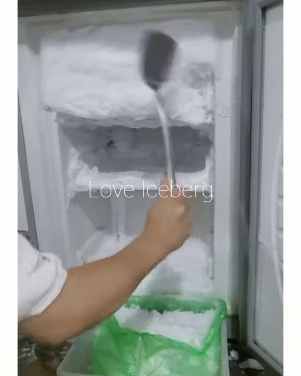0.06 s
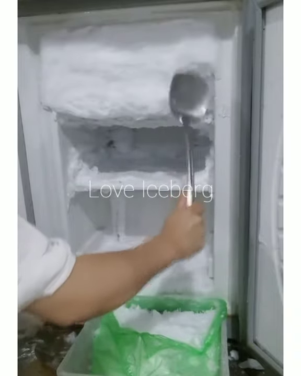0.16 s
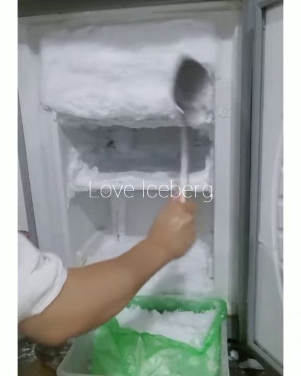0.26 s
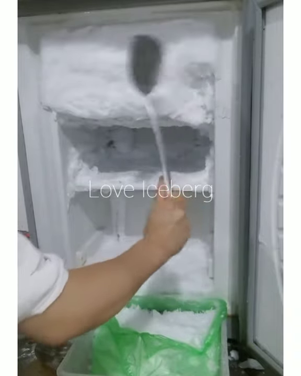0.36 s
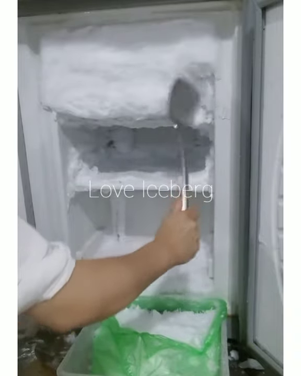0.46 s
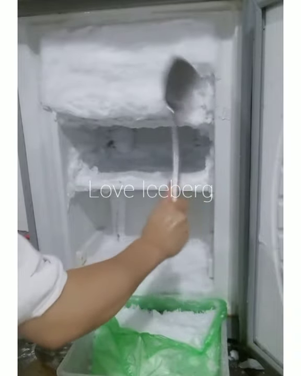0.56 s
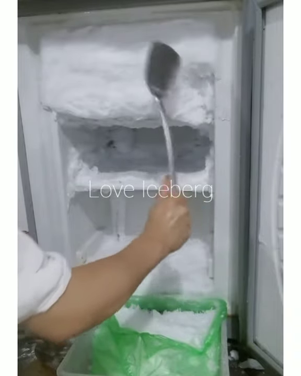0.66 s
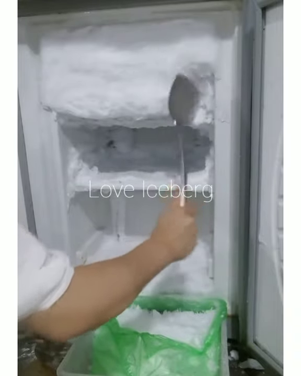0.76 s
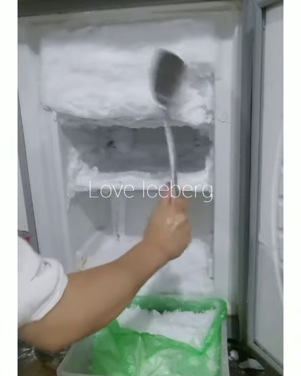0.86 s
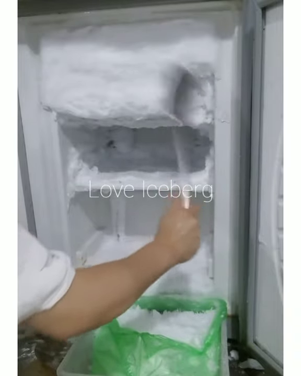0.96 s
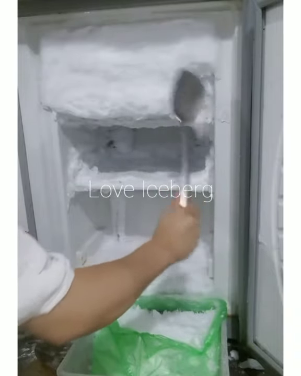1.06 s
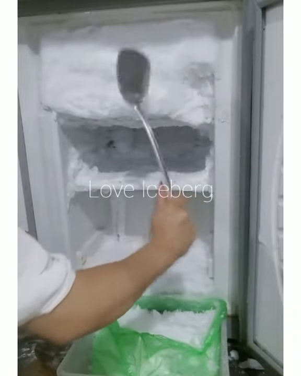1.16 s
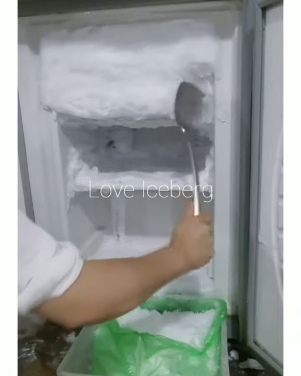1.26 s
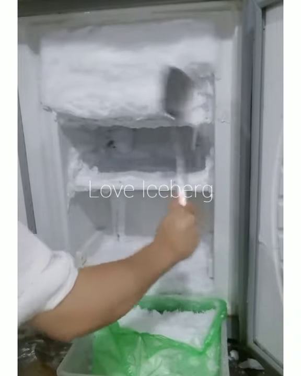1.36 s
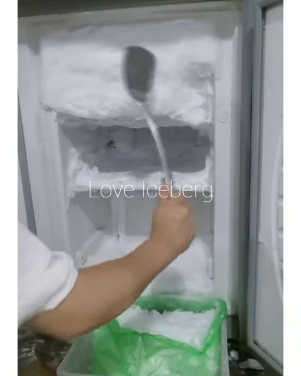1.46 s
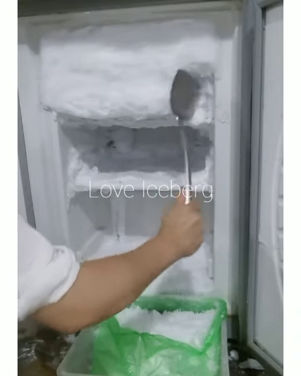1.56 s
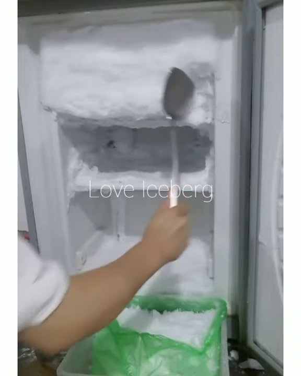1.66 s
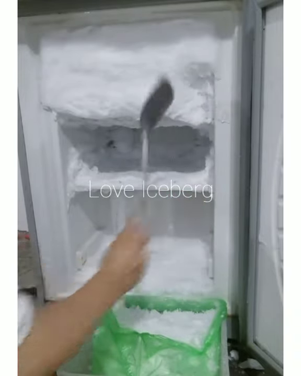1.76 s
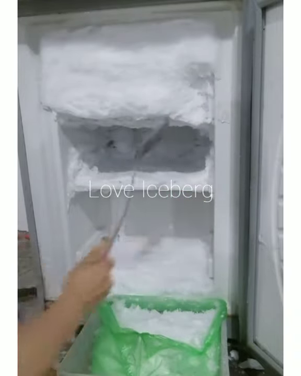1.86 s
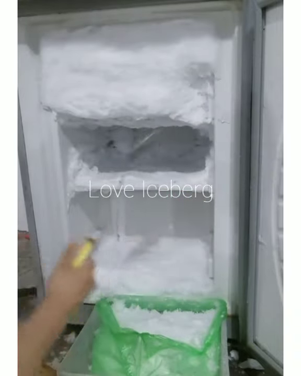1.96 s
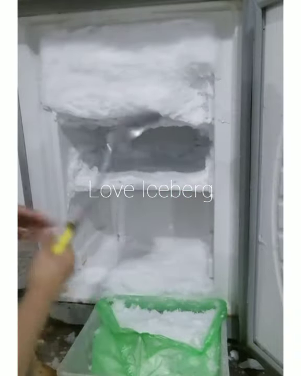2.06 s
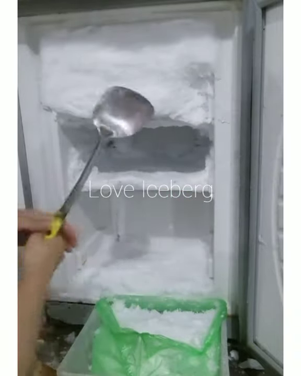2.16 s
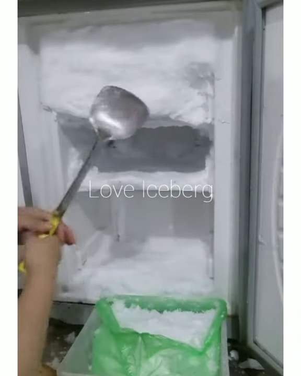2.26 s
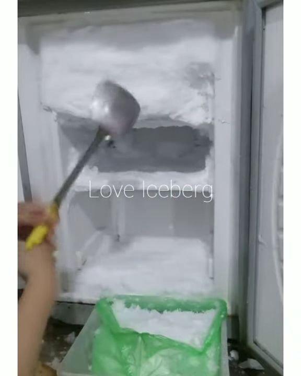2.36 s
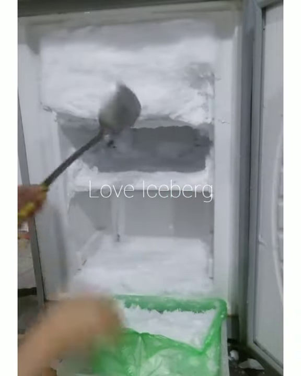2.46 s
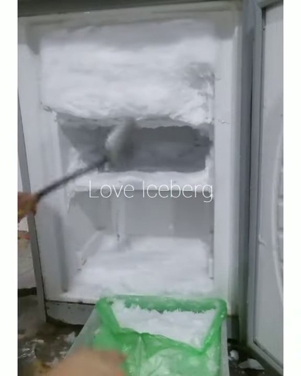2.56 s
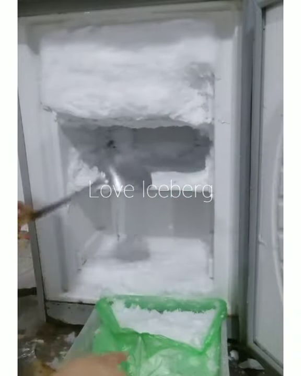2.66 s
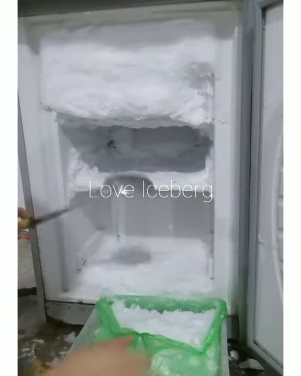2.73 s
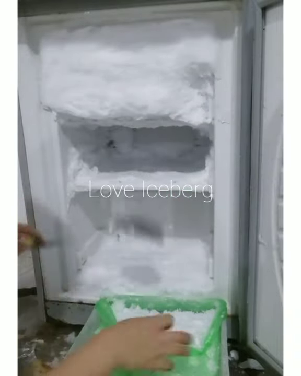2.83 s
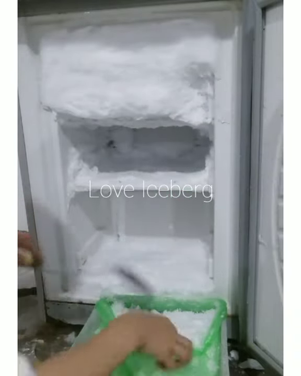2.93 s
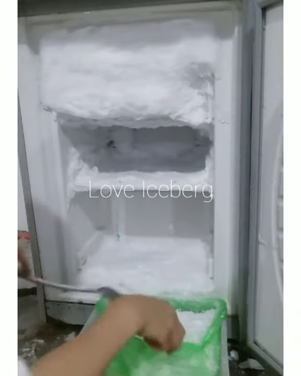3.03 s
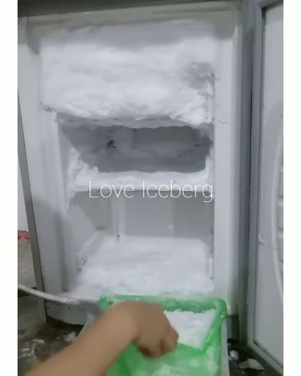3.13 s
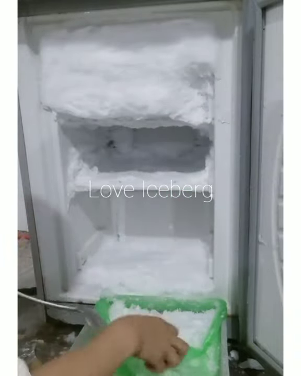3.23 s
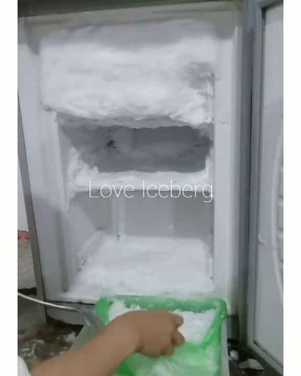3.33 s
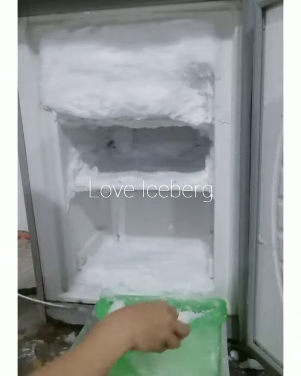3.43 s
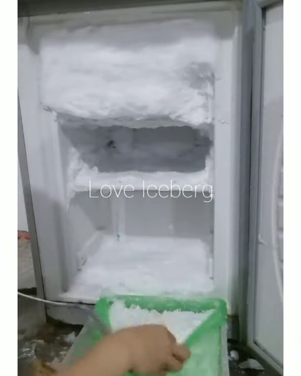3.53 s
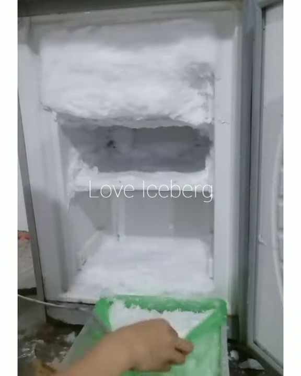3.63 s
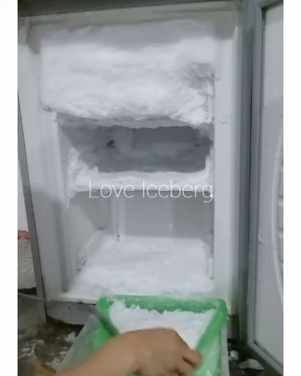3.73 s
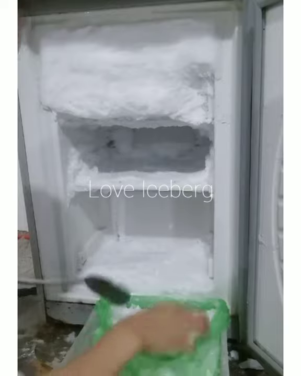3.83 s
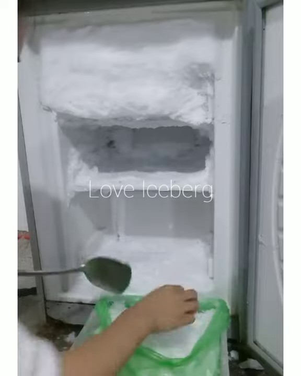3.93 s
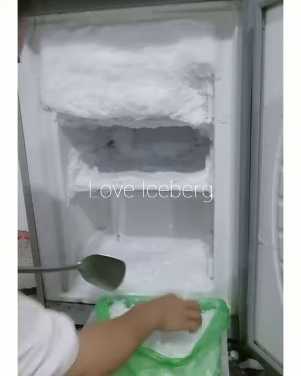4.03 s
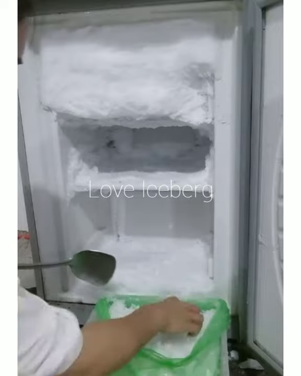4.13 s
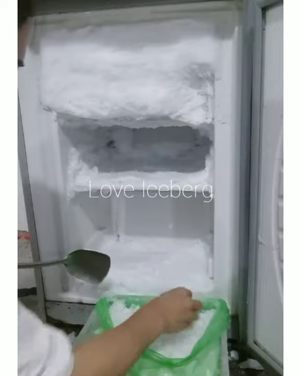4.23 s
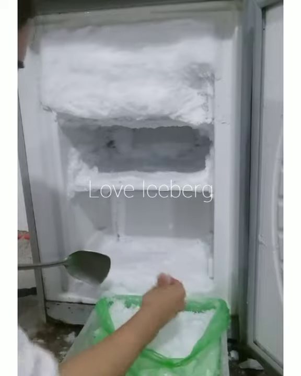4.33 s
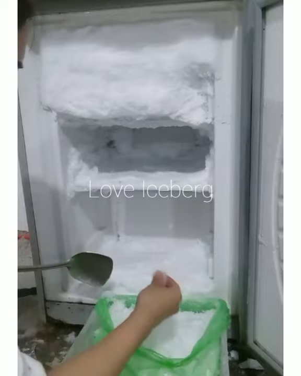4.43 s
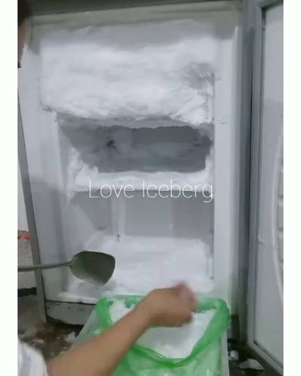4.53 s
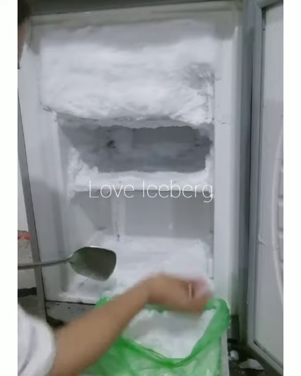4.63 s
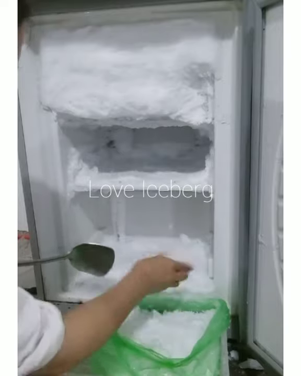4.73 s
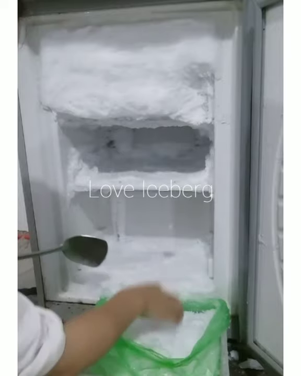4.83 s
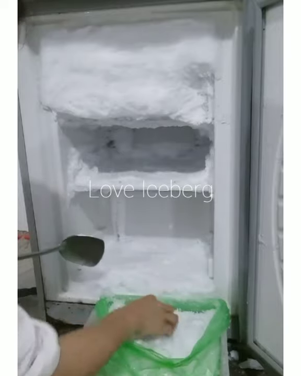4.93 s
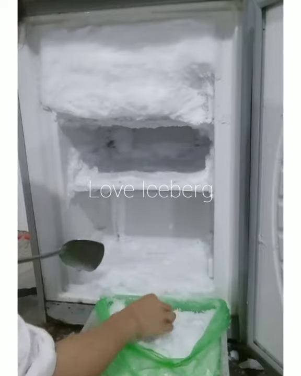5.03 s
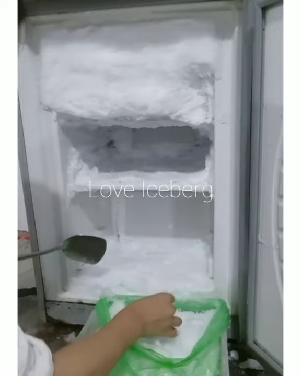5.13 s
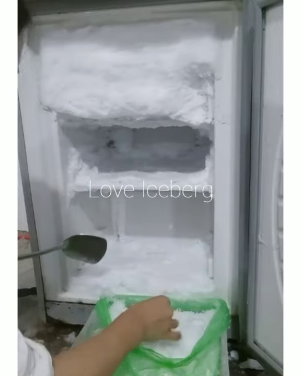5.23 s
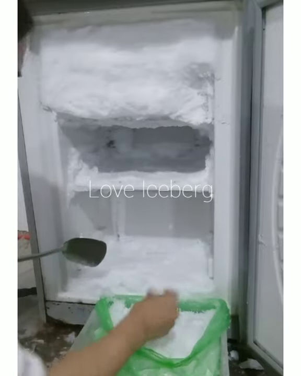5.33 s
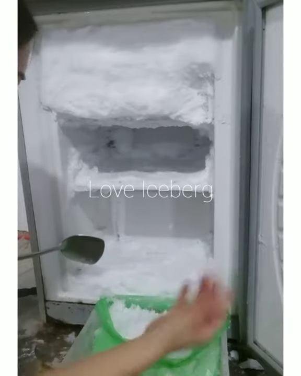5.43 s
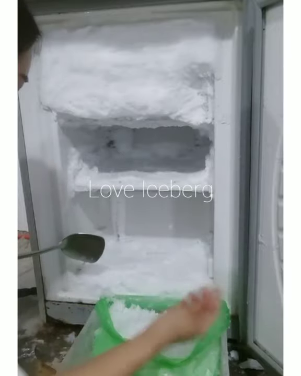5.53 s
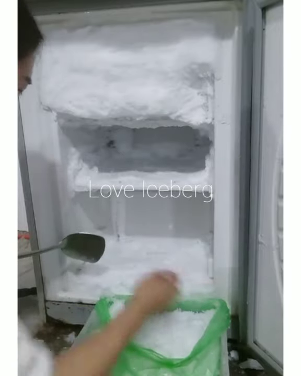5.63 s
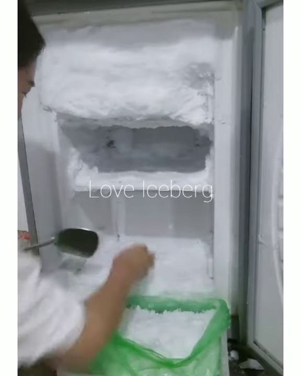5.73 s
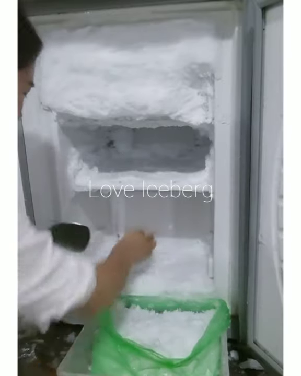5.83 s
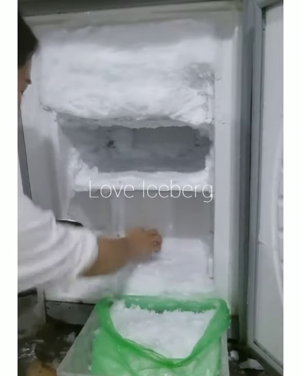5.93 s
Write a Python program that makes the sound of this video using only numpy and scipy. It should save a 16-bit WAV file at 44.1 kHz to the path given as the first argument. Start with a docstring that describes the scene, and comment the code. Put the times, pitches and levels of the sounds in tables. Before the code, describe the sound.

A thin steel spatula hacks at thick freezer frost for under two seconds, in uneven blows with gritty, hissing scrapes and a dull cabinet thump. After a pause, a hand crunches through loose frost in a bag, a few lumps drop and rumble, and a handful is scattered at the end. Close phone microphone, hard reverberant tiled room.

```python
"""A tiled room with an open freezer: a steel spatula chops thick frost, each blow cracking ice, ringing the
blade and thumping the cabinet, with crumbs grinding on after it. Then a hand digs in a bag of loose frost,
lumps land and roll, and handfuls are thrown in. Blows are noise bursts and pushes through resonances; frost is
coloured grit, with a bright band near 8 kHz. The room answers; one phone microphone limits the loudest peaks."""
import sys
import numpy as np
from scipy import signal
from scipy.fft import rfft, irfft, next_fast_len
from scipy.io import wavfile
from scipy.ndimage import uniform_filter1d

SR = 44100
rng = np.random.default_rng(int(sys.argv[2]) if len(sys.argv) > 2 else 0)


def transcribe(signal):
    """Save signal, clipped to [-1, 1], as a 16-bit WAV file at the path in sys.argv[1]."""
    frames = np.atleast_2d(signal).T
    limited = np.clip(frames, -1, 1)
    pcm = np.round(limited * 32767).astype(np.int16)
    wavfile.write(sys.argv[1], SR, pcm)


N = 264159  # samples

# All table levels are relative; the layers set their own gains.
# Idle room noise: f/Hz, level/dB
IDLE_COLOUR = [(15, -61), (25, -26), (170, -5), (200, 1), (229, -13), (439, -6.5), (503, -14.5), (591, -10),
               (754, -22.5), (818, -18.5), (962, -22.5), (1100, -22.5), (16000, -50.5)]
# Decay of the tiled room: f/Hz, t60/s
ROOM_DECAY = [(80, 2), (400, 1.5), (1100, 1.21), (2100, 1.165), (3200, 0.75), (7700, 0.42), (15000, .25)]

# Hand digging in the bag: t/s, first level/dB, push/s, rise/(dB/s), fade/(dB/s), crusts over fine frost/dB
DIGS = [(2.934, -43.5, 0.08, 162, 157, -7.5), (3.14, -48, 0.11, 90, 298, -37),
        (3.227, -37.5, 0.058, 7, 132, -2), (3.29, -52, 0.016, 5, 150, -27.5),
        (3.334, -29.5, 0.16, 31.5, 97, -3.5), (3.757, -47.5, 0.082, 11, 137.5, -7.5)]
# Handfuls scattering in the cabinet: t/s, first level/dB, fade/(dB/s)
THROWS = [(5.738, -62, 305), (5.787, -20.5, 98), (5.976, -23, 250)]
# Crystals flying off the dropped lump: t/s, first level/dB, duration/s
SPRAYS = [(4.919, -50.5, 0.13), (5.042, -58.5, 0.078)]
# Crunches in loose frost: t/s, peak level/dB, tilt/(dB/octave)
CRUNCHES = [(2.9522, -31, 2), (3.0031, -17, 3), (3.2288, -6.5, 2), (3.2962, -9.5, 4), (3.334, -4, 1),
            (3.545, -7, -14.5), (3.714, -28.5, -25), (5.7389, -37, -2.5), (5.7866, 0.5, -1.5),
            (5.8027, -4, -0.5), (5.8176, -2.5, 5), (5.9758, -14.5, 2)]
# Colours of fine frost, lump spray, thrown frost, hard crusts and the shifting bag: f/Hz, level/dB
FROST_COLOUR = [(500, -65.5), (1000, -30.5), (2300, -13), (3500, -7.5), (5000, -10.5), (7000, -5),
                (8000, 1), (8700, -6), (9300, -8), (10500, -14), (16000, -25)]
SPRAY_COLOUR = [(1760, -35), (3000, -3.5), (4410, -6.5), (5250, -17), (8050, 2.5), (10200, -21.5),
                (11400, -20), (16000, -28.5)]
THROWN_COLOUR = [(400, -21.5), (900, -15.5), (1300, -3.5), (1700, -6), (5000, -12), (7000, -10.5),
                 (8000, -2.5), (8800, -13), (10500, -21.5), (16000, -25)]
CRUST_COLOUR = [(250, -33), (700, -19.5), (1000, -13.5), (1400, -4), (2400, -2.5), (3500, -6),
                (6000, -18.5)]
BAG_COLOUR = [(40, -31), (90, 0.5), (200, -4), (450, -1.5), (800, -14), (1200, -27)]

# Frozen lumps landing: t/s, peak level/dB, contact/s, knock over thump/dB, place (0 tub, 1 cabinet)
LUMPS = [(4.901, -37.5, 0.0019, -9, 0), (4.924, -7.5, 0.00068, -12, 0), (5.036, -19, 0.000824, 9, 0),
         (5.053, -24.5, 0.0015, 2.5, 1), (5.79, -23, 0.00088, 9, 1), (5.804, -33, 0.0026, 9, 1),
         (5.821, -13.5, 0.0018, -3, 1)]
# Lumps rolling: t/s, first level/dB, rolling time/s, fade/(dB/s)
ROLLS = [(4.92, -21, 0.13, 70), (5.03, -27, 0.205, 58), (5.793, -20.5, 0.156, 505), (5.977, -39, .1, 12)]
# Rolling rumble in the tub: f/Hz, level/dB
ROLL_COLOUR = [(40, -74), (90, -15), (150, -16), (227, 5), (348, 0.5), (382, 8), (563, -1.5), (1370, -4),
               (1750, -16), (2500, -26.5), (3000, -54.5), (4400, -61), (6500, -75.5)]
# Resonances of the booming tub and of the lump itself: f/Hz, width/Hz, level/dB
TUB_MODES = [(206, 54, 7.5), (233, 49, 6.5), (404, 8.9, 11), (527, 160, 10.5)]
LUMP_MODES = [(780, 230, 4), (1156, 490, 4.5), (2373, 800, -4), (4000, 1000, -13.5)]

# Blade on ice: t/s, tip level/dB, then over the tip: root/dB, handle/dB, ice/dB, cabinet/dB; contact/s
BLOWS = [(0.2139, 1.5, -27.5, -16.5, -3.5, -23, 0.0051), (0.2199, -2, -16.5, 6.5, -2.5, -19.5, 0.0064),
         (0.472, -30.5, -13, -12, 4.5, -21.5, 0.016), (0.4918, -1, -13.5, -26, 1.5, -29.5, 0.0095),
         (0.5104, -1.5, -5.5, 2, 1, -25.5, 0.0061), (0.5531, -19, -7, 8.5, 2.5, -2, 0.0071),
         (0.5731, -15.5, -9.5, 7, 2.5, -4, 0.011), (0.7637, -6.5, -16, -15.5, 3.5, -18, 0.0077),
         (0.7701, -4, -30.5, -23.5, 0, -21, 0.016), (0.9113, -43, -15.5, -4.5, 2, 2.5, 0.006),
         (0.9494, -35.5, -3, 6, 4, 5, 0.0076), (1.0256, -1, -16.5, -0.5, -4.5, -14.5, 0.0092),
         (1.0534, -14.5, -20.5, -12, 2, -14.5, 0.009), (1.1099, -3, -33.5, -30.5, -16, -35, 0.0077),
         (1.3039, 1.5, -14.5, -21, -5.5, -20, 0.0084), (1.3354, -5.5, -17, -17.5, -6.5, -22.5, 0.011),
         (1.3693, -12.5, -16, -6, -3, -12.5, 0.014), (1.6043, -9.5, -15, -15, -3.5, -7, 0.011),
         (1.6182, -0.5, -11.5, -3.5, 2.5, -21.5, 0.0061)]
# Grinding strokes: t/s, body level/dB, press/s, fade before pace/(dB/s),
# then over the body: tip/dB, finest crystals/dB, walls/dB, shelf/dB
STROKES = [(0.0, -21, 0.076, 201, 2, -16.5, 6, -5.5), (0.225, -22, 0.033, 102.5, 2, -3.5, 5.5, 4),
           (0.518, -27, 0.011, 208, -12, -10.5, 11, 0), (0.569, -25.5, .03, 128.5, -2.5, -18, 4, 6),
           (0.782, -27, 0.004, 237, -9.5, 3.5, 15, -2), (1.035, -25, .012, 140, 1.5, -8.5, 8.5, 0.5),
           (1.114, -40.5, 0.0073, 150.5, 7.5, -12.5, 3.5, 11.5), (1.31, -13, 0.19, 91, -4, -21, -6, 0.5),
           (1.561, -36.5, .04, 199.5, -7.5, 1, 4, 1), (1.624, -25.5, 0.015, 181, -0.5, -4, 7.5, -6.5),
           (1.699, -39.5, 0.071, 304.5, -15, -9, 8, -8)]
# Fade speed factor of tip, body, finest crystals, walls, shelf
FADE_PACE = [1.1, 1.15, 2.1, 1.405, 0.71]
# Crumbs running on, over the start of each layer (same order): level/dB
TRICKLE_DB = [-43, -25.5, -55.5, -26.5, -23.5]
# Middle, then shoulder, following the root: level over tip/dB, share of the root's swing in dB
WITH_ROOT = [(-21, 0.3), (-16, 0.1)]
# Resonances of the blade's tip, root, middle, shoulder and handle: f/Hz, width/Hz, level/dB
TIP_MODES = [(7370, 120, -10), (7940, 400, 6), (8600, 580, -10.5), (8780, 410, -13), (10400, 400, -10)]
ROOT_MODES = [(2830, 39, -8.5), (3250, 137, -0.5)]
MIDDLE_MODES = [(4005, 47, 0)]
SHOULDER_MODES = [(5447, 140, -3.5), (5840, 52, -8.5)]
HANDLE_MODES = [(1267, 260, -2.5), (1700, 150, -6), (2000, 270, -13)]
# The buried blade radiates little above its modes: f/Hz, level/dB
DAMPED_COLOUR = [(9500, -1), (12000, -8.5), (16000, -32.5)]
# Colours of cracking ice and of the finest crystals: f/Hz, level/dB
ICE_COLOUR = [(500, -47), (1300, -5.5), (2100, 2), (3000, 1.5), (4800, -6.5), (6500, -3), (8000, 9.5),
              (10000, -8), (12000, -29.5), (16000, -54.5)]
FINE_COLOUR = [(6000, -25), (9500, -3), (11600, -2.5), (13000, -5), (16000, -9.5)]
# Resonances of the freezer's walls and hollow, and of its iced shelf: f/Hz, width/Hz, level/dB
CABINET_MODES = [(88, 24, -7.5), (169.1, 57, -3), (220, 42, 3), (293, 24, 4.5), (364, 41, -3)]
SHELF_MODES = [(441.8, 105, 0.5), (503, 120, 1.5), (600, 77, 2), (861, 190, -7.5)]

IDLE_DB = -62
HAND_ONSET_DB_PER_S, HIT_ONSET_DB_PER_S = 900, 3998.5  # how fast a movement sets in
STOP_DB_PER_S = 900  # once a lump or its spray comes to rest
SPRAY_SAG_DB_PER_S = 52
CRUNCH_S = 0.011
BLOW_SCATTER_DB = 3  # chance spread of middle and shoulder
PRESS_SAG_DB_PER_S, TRICKLE_DB_PER_S = 34.5, 51  # sag under pressure, fade of crumbs; both before the pace
MIC_HZ, TOP_HZ = 15680, 16947  # treble starts to roll off, hard upper limit


def amp(db):
    """Level in dB to linear gain."""
    return 10 ** (np.asarray(db) / 20)


def unit(x):
    """x scaled to an RMS of one."""
    return x / np.sqrt(np.mean(x ** 2) + 1e-20)


def along(points, hz):
    """Read (f/Hz, value) points on a log frequency axis."""
    f, v = np.transpose(points)
    return np.interp(np.log(hz + 1), np.log(f + 1), v)


def filtered(x, response):
    """x times a complex response of frequency."""
    m = next_fast_len(N + SR // 2)
    spectrum = rfft(x, m) * response(np.fft.rfftfreq(m, 1 / SR))
    return irfft(spectrum, m)[..., :N]


def through(x, modes):
    """x rings resonances of alternating sign; white input keeps its power."""
    def response(f):
        h = 0
        for k, (centre, width, db) in enumerate(modes):
            damping = 1j * f * width
            h = h + (-1) ** k * amp(db) * damping / (centre * centre - f * f + damping)
        return h / np.sqrt(np.mean(abs(h) ** 2))
    return filtered(x, response)


def coloured(x, spectrum):
    """x with a causal, minimum-phase colour; white input keeps its power."""
    m = 4096
    cepstrum = irfft(np.log(amp(along(spectrum, np.fft.rfftfreq(m, 1 / SR))) + 1e-6))
    cepstrum[1:m // 2] *= 2
    cepstrum[m // 2 + 1:] = 0
    pulse = irfft(np.exp(rfft(cepstrum)))
    return signal.fftconvolve(x, pulse / np.linalg.norm(pulse))[:N]


def grit(spread_db, clump_db, clump_s):
    """Tiny breaks, one chance per sample: sizes have a long tail and come in clumps."""
    clumps = unit(uniform_filter1d(rng.standard_normal(N), max(2, int(clump_s * SR))))
    size_db = spread_db * rng.exponential(size=N) + clump_db * clumps
    return unit(rng.standard_normal(N) * amp(size_db))


def patchy(x, depth_db, patch_s):
    """The colour wanders: random gain in patches of some hundred Hz that last patch_s."""
    z = signal.stft(x, nperseg=256)[2]
    field = uniform_filter1d(rng.standard_normal(z.shape), size=3, axis=0)
    field = uniform_filter1d(field, size=int(patch_s * SR / 128), axis=1)
    return unit(signal.istft(z * amp(depth_db * unit(field)), nperseg=256)[1][:N])


def bursts(times, db, lengths, lead_s):
    """Envelope of contacts: a faint run-in, a sudden start and a bell-shaped fall."""
    t, env = np.arange(N) / SR, np.zeros(N)
    for s, level, length in zip(times, db, np.maximum(lengths, 1e-3)):
        near = slice(max(0, int((s - .05) * SR)), int((s + .1) * SR))
        u = t[near] - s
        env[near] += amp(level) * np.where(u < 0, .18 * np.exp(u / lead_s), np.exp(-(u / length) ** 2))
    return env


def pushes(times, db, lengths):
    """Soft contacts: one smooth push each, duller the longer it lasts."""
    out = np.zeros(N)
    for s, level, length in zip(times, db, np.maximum(lengths, 1e-4)):
        u = np.arange(int(8 * length * SR)) / (length * SR)
        part = out[round(s * SR):][:len(u)]
        part += amp(level) * (u * np.exp(1 - u))[:len(part)] / np.sqrt(length * SR)
    return out


def gestures(times, db, lengths, rise, fade, onset=HIT_ONSET_DB_PER_S):
    """Summed gain of movements: a quick onset, rise dB/s over their length, then fade dB/s."""
    t = np.arange(0, N + 32, 32) / SR
    u = t[:, None] - times
    held_db = db + onset * np.minimum(u, 0) + rise * np.clip(u, 0, lengths)
    gain = amp(held_db - abs(fade) * np.maximum(u - lengths, 0))
    return np.interp(np.arange(N) / SR, t, gain.sum(axis=1))


def idle_room():
    """Steady background noise, uneven in fine clumps."""
    return amp(IDLE_DB) * coloured(grit(spread_db=.3, clump_db=.8, clump_s=.05), IDLE_COLOUR)


def room(x, piece_s):
    """Each frequency of the tail dies at its own speed; moving sources meet a new tail every piece_s."""
    out, step = np.zeros(N + 3 * SR), int(piece_s * SR)
    for start in range(0, N, step):
        hz, t, z = signal.stft(rng.standard_normal(SR * 3 // 2), SR, nperseg=256)
        decay = amp(-60 * t / along(ROOM_DECAY, hz)[:, None])
        tail = signal.istft(z * decay, SR, nperseg=256)[1]
        wet = signal.fftconvolve(x[start:start + step], tail / np.linalg.norm(tail))
        out[start:start + len(wet)] += wet
    return out[:N]


def bag(movement):
    """The bag shifts in its tub: its load follows the hand, less steeply."""
    weight = amp(-37.0) * np.sqrt(abs(uniform_filter1d(movement, size=2000)))
    return coloured(weight * rng.standard_normal(N), BAG_COLOUR)


def crunches():
    """Short noise bursts in the frost's colour, tilted darker or brighter about 4 kHz."""
    sound = np.zeros(N)
    for s, db, tilt_db in CRUNCHES:
        tilted = [(hz, level + tilt_db * np.log2(hz / 4000)) for hz, level in FROST_COLOUR]
        burst = bursts([s], [db - 17.5], [CRUNCH_S], lead_s=.003)
        sound += coloured(burst * rng.standard_normal(N), tilted)
    return sound


def loose_frost():
    """Fine crystals hiss as they shear, harder crusts crunch, and the bag moves with the hand."""
    s, db, push, rise, fade, crust_db = np.transpose(DIGS)
    digging = gestures(s, db, push, rise, fade, HAND_ONSET_DB_PER_S)
    crusts = gestures(s, db + crust_db, push, rise, fade, HAND_ONSET_DB_PER_S)
    s, db, lasts = np.transpose(SPRAYS)
    spraying = gestures(s, db, lasts, -SPRAY_SAG_DB_PER_S, STOP_DB_PER_S)
    s, db, fade = np.transpose(THROWS)
    throwing = gestures(s, db, 0, 0, fade)
    grains = patchy(grit(spread_db=1.5, clump_db=2, clump_s=.005), depth_db=2.5, patch_s=.04)
    sound = coloured(digging * grains, FROST_COLOUR)
    sound += coloured(spraying * grains, SPRAY_COLOUR)
    sound += coloured(amp(3.0) * throwing * grains, THROWN_COLOUR)
    sound += coloured(crusts * grains, CRUST_COLOUR)
    return sound + bag(digging + throwing) + crunches()


def lumps():
    """Soft lumps push the tub or the cabinet with little treble, crack a little, then rumble as they roll."""
    s, db, contact, knock_db, place = np.transpose(LUMPS)
    start, roll_db, lasts, fade = np.transpose(ROLLS)
    rolling = gestures(start, roll_db, lasts, -fade, STOP_DB_PER_S)
    rolling = rolling * grit(spread_db=1, clump_db=1.5, clump_s=.008)
    cracks = bursts(s, db + knock_db - 10.5, 5 * contact, lead_s=0.0028) * rng.standard_normal(N)
    cracks = uniform_filter1d(cracks, size=6)  # softens the treble
    knock = through(pushes(s, db + knock_db + 10, contact / 3) + cracks, LUMP_MODES)
    inside = place > .5
    tub = through(pushes(s[~inside], db[~inside] + 9, contact[~inside]), TUB_MODES)
    cabinet = through(pushes(s[inside], db[inside], contact[inside]), CABINET_MODES)
    return coloured(rolling, ROLL_COLOUR) + tub + cabinet + knock


def strokes():
    """Grinding gains: strokes press, fade and trickle on; finest crystals die fastest, the shelf slowest."""
    s, db, press, fade, tip_db, fine_db, walls_db, shelf_db = np.transpose(STROKES)
    gains = []
    for over_db, pace, after_db in zip([tip_db, 0, fine_db, walls_db, shelf_db], FADE_PACE, TRICKLE_DB):
        pressed = gestures(s, db + over_db, press, -pace * PRESS_SAG_DB_PER_S, pace * fade)
        trickle = gestures(s, db + over_db + after_db, 0, 0, pace * TRICKLE_DB_PER_S)
        gains.append(pressed + trickle)
    return gains


def blow_force(db):
    """Each blow shakes a part with a fresh burst of noise as long as the contact."""
    s, contact = np.transpose(BLOWS)[[0, -1]]
    return bursts(s, db, contact, lead_s=0.0052) * rng.standard_normal(N)


def freezer_cabinet(walls, shelf):
    """The slab passes each jolt on to walls and shelf a little late; grinding makes them rumble."""
    s, tip_db, _, _, _, cabinet_db, _ = np.transpose(BLOWS)
    shoves = np.gradient(pushes(s + 0.011, tip_db + cabinet_db + 41.5, np.full(len(s), 0.0012)))
    wall_rumble = walls * grit(spread_db=1, clump_db=1.5, clump_s=.01)
    shelf_rumble = shelf * grit(spread_db=1, clump_db=1.5, clump_s=.01)
    sound = through(shoves + amp(-3.5) * wall_rumble, CABINET_MODES)
    return sound + through(amp(3.0) * shoves + amp(-6.5) * shelf_rumble, SHELF_MODES)


def cracking_ice(edge, bulk, fine):
    """Blows crack ice and its finest crystals; loose crumbs hiss past the edge."""
    _, tip_db, _, _, ice_db, _, _ = np.transpose(BLOWS)
    sound = coloured(blow_force(tip_db + ice_db - 12.5) + amp(-0.5) * bulk, ICE_COLOUR)
    sound += coloured(blow_force(tip_db + ice_db - 16.5) + fine, FINE_COLOUR)
    return sound + coloured(amp(-5.5) * edge, FROST_COLOUR)


def blade(edge, bulk):
    """Parts of the blade ring; a blow that jars the root drives its neighbours harder."""
    _, tip_db, root_db, handle_db, _, _, _ = np.transpose(BLOWS)
    chance_db = BLOW_SCATTER_DB * rng.standard_normal((2, len(tip_db)))
    root_swing_db = root_db - root_db.mean()
    middle_db, shoulder_db = [db + share * root_swing_db + luck
                              for (db, share), luck in zip(WITH_ROOT, chance_db)]
    sound = through(blow_force(tip_db - 11.5) + amp(-2.5) * edge, TIP_MODES)
    sound += through(blow_force(tip_db + root_db - 7.5) + amp(-14.5) * bulk, ROOT_MODES)
    sound += through(blow_force(tip_db + middle_db - 2.5) + amp(-16.5) * bulk, MIDDLE_MODES)
    sound += through(blow_force(tip_db + shoulder_db - 1.5) + amp(-15.5) * bulk, SHOULDER_MODES)
    sound += through(blow_force(tip_db + handle_db - 14.5) + amp(-8) * bulk, HANDLE_MODES)
    return coloured(sound, DAMPED_COLOUR)


def spatula():
    """Blows and grinding shake the parts of the blade, the ice and the cabinet."""
    edge, bulk, fine, walls, shelf = strokes()
    grains = patchy(grit(spread_db=1.5, clump_db=2, clump_s=.004), depth_db=2.5, patch_s=.03)
    grains = patchy(grains, depth_db=1.8, patch_s=.2)  # the point of contact moves along the blade
    edge, bulk, fine = edge * grains, bulk * grains, fine * grains
    return blade(edge, bulk) + cracking_ice(edge, bulk, fine) + freezer_cabinet(walls, shelf)


def scene():
    """All sources, the room's answer and its idle noise, the same in both channels."""
    chopping, loose = spatula(), loose_frost() + lumps()
    answer = room(amp(-11) * chopping + amp(-18) * loose, piece_s=.4)
    mono = chopping + loose + answer + idle_room()
    return np.array([mono, mono])


def record(dry):
    """The microphone loses deep bass and top treble; loud peaks saturate; nothing stays above the limit."""
    def microphone(hz):
        treble = amp(-.17 * np.maximum(hz - MIC_HZ, 0))
        bass = (1j * hz / (1j * hz + 40)) ** 2
        return treble * bass
    x = filtered(dry, microphone)
    x = x / (1 + abs(x) ** 8) ** (1 / 8)
    return filtered(x, lambda hz: hz < TOP_HZ)


dry = scene()
out = record(dry)
transcribe(out)
```